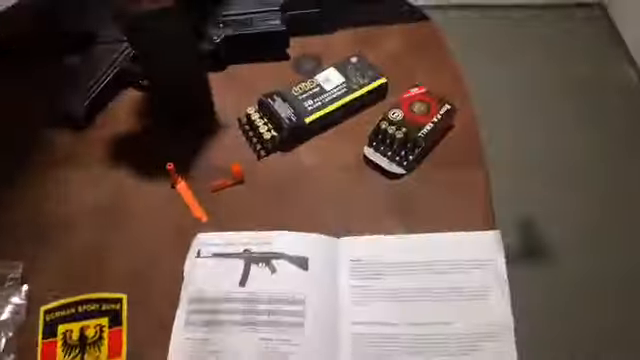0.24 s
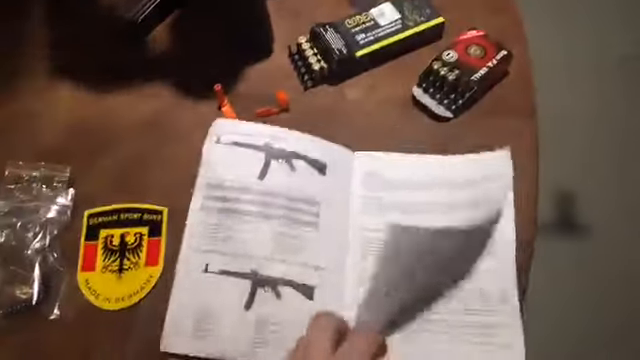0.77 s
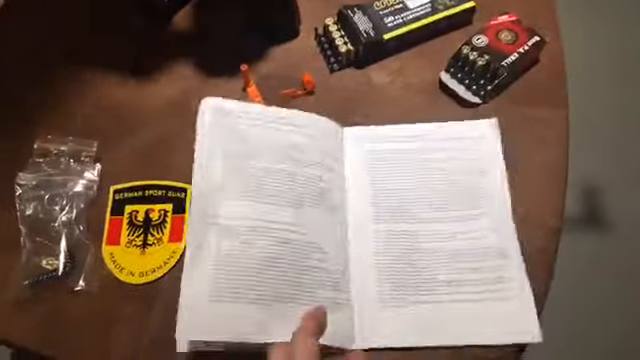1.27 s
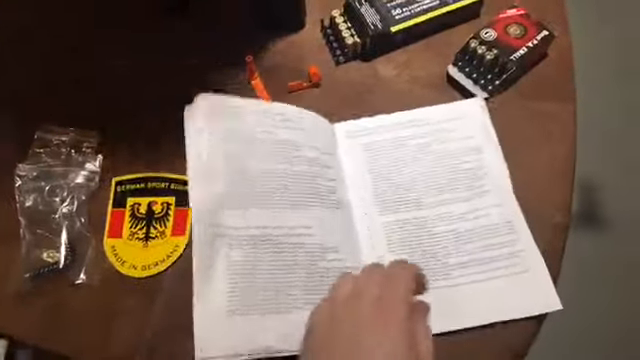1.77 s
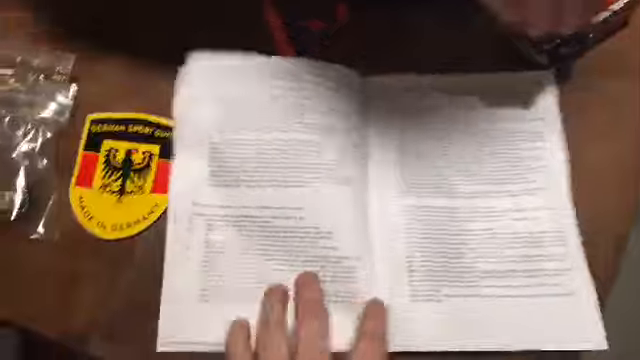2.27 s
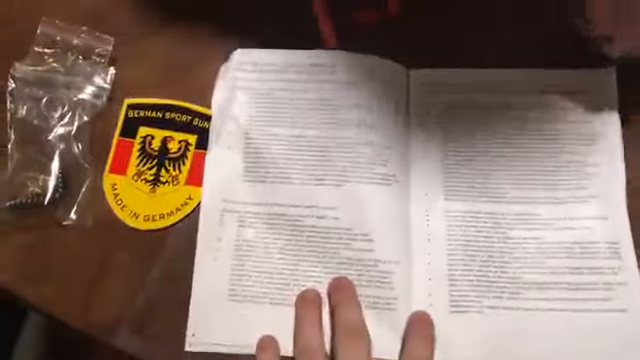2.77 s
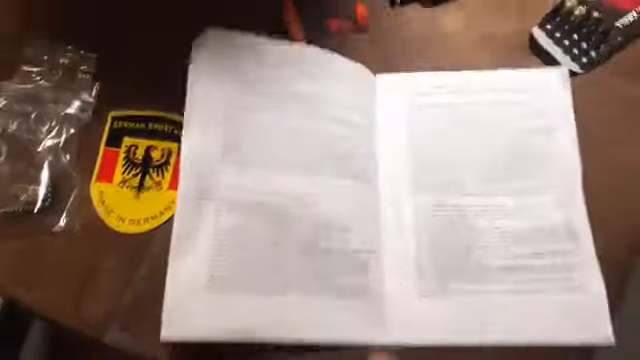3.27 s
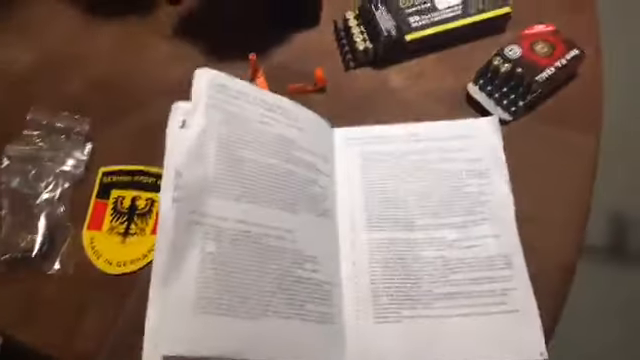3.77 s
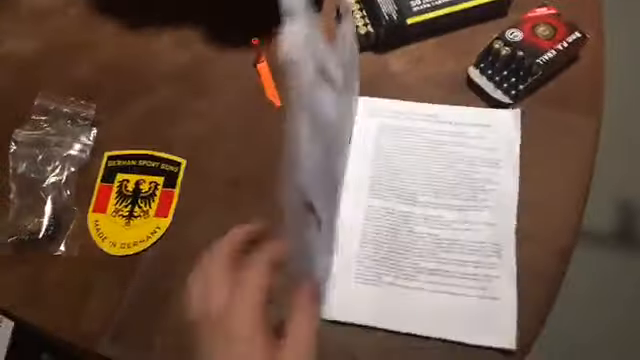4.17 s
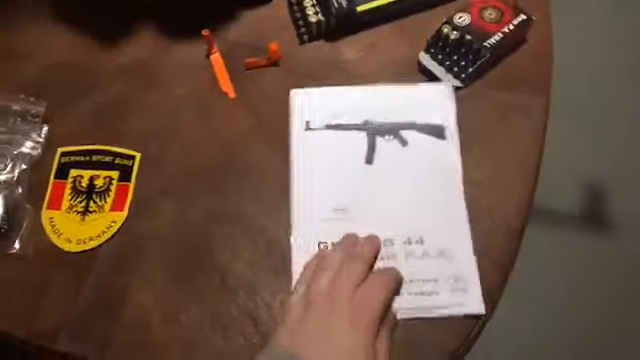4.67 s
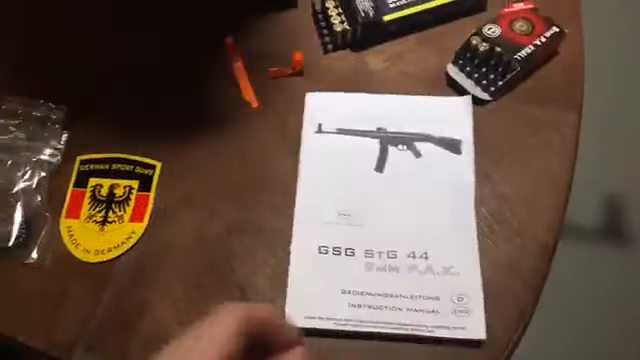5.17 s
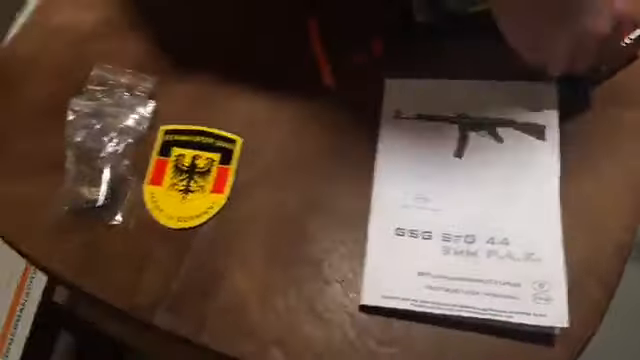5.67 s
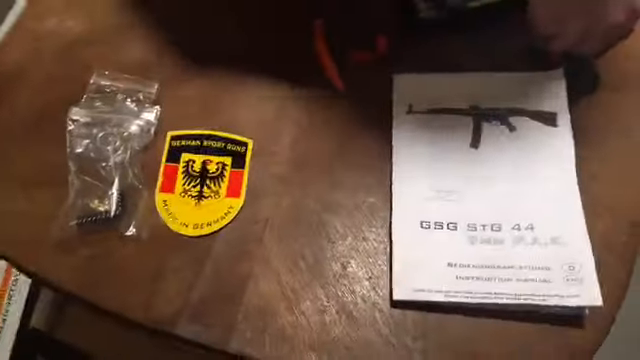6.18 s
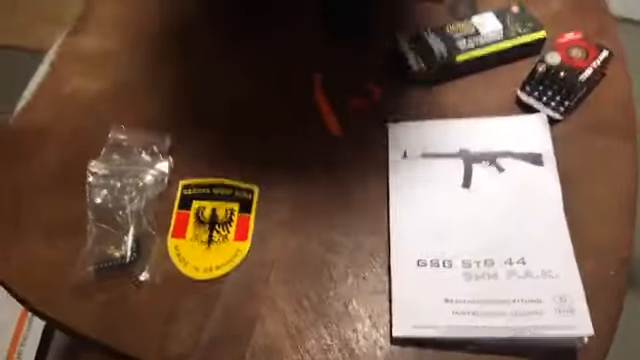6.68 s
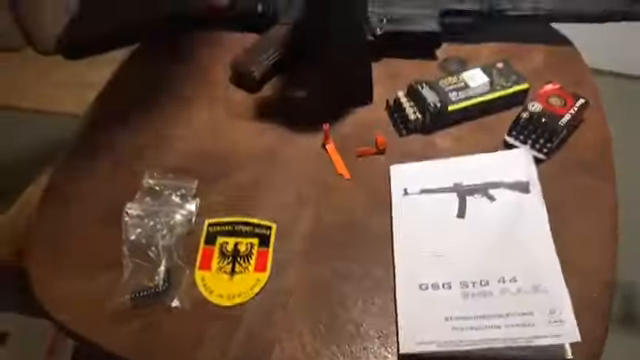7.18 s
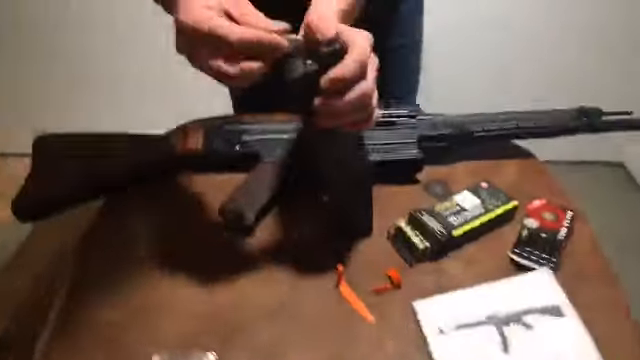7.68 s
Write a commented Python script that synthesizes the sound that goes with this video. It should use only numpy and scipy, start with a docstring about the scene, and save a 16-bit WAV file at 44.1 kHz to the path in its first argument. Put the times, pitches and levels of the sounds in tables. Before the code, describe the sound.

Close-miked handling of metal cartridges and a magazine over a wooden table. Uneven ticks and rattles with page rustle open, leading to a bright snap, then a quiet lull of rubbing. A hard clack and thump break it, another cluster of clicks follows, then mostly faint scuffs before small knocks and three sharp clicks near the end. A short bright room echo and faint low household rumble surround everything.

```python
"""Cartridges and a magazine handled over a table

Heard close by in a small, hard room, brass and steel click as chatters of noise that shake a magazine shell.
Knocks excite the modes of a wooden table top; pages, fingers, card and metal rub as stick-slip noise grains.
A faint scrape sounds a spring, decaying noise forms the room's echo, and a low household rumble lies beneath."""
import sys
import numpy as np
from scipy import signal
from scipy.fft import rfft, irfft, next_fast_len
from scipy.io import wavfile
from scipy.ndimage import uniform_filter1d

SR = 44100
rng = np.random.default_rng(int(sys.argv[2]) if len(sys.argv) > 2 else 0)


def master(y):
    """Save y as 16-bit WAV."""
    cut = np.clip(np.atleast_2d(y).T, -1, 1)
    pcm = np.round(cut * 32767)  # scale
    wavfile.write(sys.argv[1], SR, pcm.astype(np.int16))


N = 349713

# All levels below are those before the microphone's response.
# Contacts of brass, steel, card and paper. Each row: start in seconds, peak of the chatter in dB,
# centre in Hz, treble share in dB.
CONTACTS = [(0.545, -29, 2980, 1), (0.623, -24.5, 3800, -15), (0.71, -16, 1920, -2.5),
            (0.8651, -23, 2430, -9.5), (0.9553, -26.5, 1850, 12), (0.9738, -26, 2370, -8),
            (1.0316, -26.5, 3200, 4), (1.123, -32.5, 2560, 19), (1.2352, -27, 2020, -7),
            (1.2954, -16, 1970, 2), (1.3494, -22.5, 3380, -4), (1.4658, -20.5, 1410, 8),
            (1.5493, -8, 8200, -6), (1.742, -36.5, 1280, -28), (2.2956, -24, 2160, 0.5),
            (2.348, -35, 1230, -13), (2.8116, -34.5, 1230, -4), (3.0968, -39.5, 1800, 1.5),
            (3.2798, -48.5, 1360, 5), (3.8568, -2.5, 2400, 6.5), (4.1726, -25, 4620, -24),
            (4.305, -33.5, 8000, -8), (4.339, -25, 7500, -2), (4.352, -26.5, 3440, -1),
            (4.4572, -27.5, 1300, 19.5), (4.487, -33.5, 2440, -22), (4.6366, -22, 3330, 27),
            (4.7238, -18.5, 2000, 9), (4.8355, -11, 7500, -5.5), (5.007, -33.5, 1930, -19),
            (5.086, -31, 1210, 14.5), (5.092, -29, 3640, 0), (5.3485, -40.5, 1780, -12),
            (6.123, -30.5, 1370, 3.5), (6.271, -31, 1240, -4.5), (6.576, -31.5, 3730, 2.5),
            (7.286, -20, 2480, 5.5), (7.3071, -22, 1200, 11), (7.333, -32, 1163, -7),
            (7.3579, -28.5, 1150, -6), (7.8154, -16.5, 5030, -9.5), (7.8536, -18.5, 1930, 8.5),
            (7.908, -18, 4530, 10)]
# Blows that reach the table top. Each row: start in seconds, peak of the table's ring in dB.
TABLE_BLOWS = [(0.221, -43), (0.464, -42.5), (0.503, -43.5), (0.593, -28), (0.71, -11.5), (0.788, -40.5),
               (0.994, -37.5), (1.391, -31), (1.821, -36.5), (2.072, -37.5), (2.557, -42.5), (2.937, -40),
               (2.96, -40.5), (3.649, -35.5), (3.751, -31.5), (3.859, -9), (4.124, -31), (4.345, -34),
               (4.635, -38.5), (4.721, -35), (4.788, -47), (4.834, -33), (5.051, -32), (5.295, -45),
               (7.29, -29.5), (7.329, -21.5), (7.359, -25), (7.417, -31.5), (7.857, -40.5)]
# Modes of the table top. Each row: frequency in Hz, relative level in dB, 60 dB decay time in seconds.
TABLE_MODES = [(71.6, -4, 0.07), (122.6, -3, 0.164), (171.5, 0.5, 0.091), (193.9, -2.5, 0.14),
               (321, 2, 0.073), (357.4, -0.5, .15), (519, -13, 0.075), (580, -34.5, 0.052)]
# Modes of the magazine shell. Each row: frequency in Hz, relative level in dB, 60 dB decay time in seconds.
SHELL_MODES = [(1138, -8, 0.036), (1620, -1, 0.0046), (2345, -16.5, 0.063), (3360, -15, .04)]
# Modes of the magazine spring. Each row: frequency in Hz, relative level in dB, 60 dB decay time in seconds.
SPRING_MODES = [(2370, 0, .04), (3420, -6, .03)]
# Scuffs of hand, paper, card and metal. Each row: start in seconds, length in seconds,
# level in dB before the swell, centre in Hz.
SCUFF_STROKES = [(0.344, 0.067, -55, 1600), (0.664, 0.082, -39, 1680), (1.257, 0.042, -38.5, 2000),
                 (1.306, 0.046, -39, 2360), (1.357, 0.052, -38, 2240), (1.729, 0.055, -59.5, 1580),
                 (2.185, 0.018, -43.5, 2000), (2.256, 0.058, -45, 1950), (2.349, 0.11, -55.5, 1250),
                 (2.43, 0.14, -52.5, 1360), (2.624, 0.051, -49.5, 1283), (2.835, 0.068, -50.5, 1250),
                 (2.966, 0.087, -61, 1560), (3.7, 0.1, -53, 1360), (3.843, 0.044, -27, 3640),
                 (4.191, 0.028, -50, 2500), (4.45, 0.02, -41.5, 1320), (4.525, 0.011, -46, 2050),
                 (4.6, 0.13, -54.5, 2130), (5.064, 0.042, -54, 1580), (5.57, 0.053, -47, 1066),
                 (5.661, 0.1, -51.5, 1180), (5.766, 0.11, -51, 1320), (5.835, 0.031, -48.5, 1030),
                 (5.897, 0.038, -48, 1250), (6.247, 0.061, -57.5, 1205), (6.288, 0.088, -47.5, 1350),
                 (6.503, 0.083, -66.5, 684), (6.993, 0.067, -68, 1490), (7.142, 0.0535, -72, 885),
                 (7.251, 0.16, -43.5, 1290)]
# Steady rustle of pages and hands. Each row: time in seconds, level in dB.
RUSTLE_LEVELS = [(0, -59), (.13, -72), (.22, -69.5), (.5, -56.5), (.8, -51), (.95, -59.5), (1.2, -56),
                 (1.5, -55.5), (1.95, -80), (2.099, -65.5), (2.6, -72.5), (3.15, -81), (3.6, -80.5),
                 (4.3, -60.5), (4.9, -70), (5.399, -81.5), (6.6, -84.5), (7.93, -80.5)]
# Reverberation of the room. Each row: frequency in Hz, 60 dB decay time in seconds, echo energy in dB.
ROOM_DECAY = [(150, 0.62, -6), (370.4, 0.65, -3.5), (1040, 0.69, 0.5), (2500, 0.78, -6.5), (5560, 0.46, -4),
              (11930, 0.29, -4.5)]
# Spectrum of the household rumble. Each row: frequency in Hz, relative density in dB per Hz.
HOUSE_SPECTRUM = [(15, -44.5), (25, 15), (176, -1), (394, -0.5), (749, -22), (1120, -12.5), (1460, -33.5),
                  (9270, -30), (15000, -22.5)]
# Microphone response. Each row: frequency in Hz, gain in dB.
MIC_RESPONSE = [(30, -12), (120, 3.5), (4000, 3.5), (7500, -5.5), (9500, -5), (12000, -9), (15000, -20)]

# chatter of a 2 kHz contact; each octave brighter multiplies its decay time by the factor
CONTACT_RISE_S, CONTACT_T60_S, CHATTER_SHORTENING = 0.0016, 0.02, 0.75
# peak of the shell against a 2 kHz contact; it is weaker under brighter (smaller) contacts
SHELL_DB, SHELL_DB_PER_OCTAVE = -13.5, -7.5
# share of the contact sent to the walls
CLICK_ECHO_DB = -1.5
# table modes below SOFT_HZ: gain in a 0 dB blow, and rise per dB as blows get weaker
SOFT_HZ, HARD_LOWS_DB, LOWS_PER_DB = 260, -8.5, 0.43
# time constant of the table's build-up as the weight settles; shell peak against the table's
KNOCK_RISE_S, KNOCK_SHELL_DB = 0.0036, -13
# bandwidth of the hollow of hand and box; levels of shell and table against it
RUB_HOLLOW_OCTAVES, RUB_SHELL_DB, RUB_TABLE_DB = 2.25, -20, -9.5
# treble of a 0.1 s scuff; longer slides hiss more
SCUFF_TREBLE_DB, TREBLE_DB_PER_DOUBLING = -1, 2.5
RUSTLE_HZ, RUSTLE_TREBLE_DB = 2000, 3
SPRING_S, SPRING_DB = 5.9, -66
# rms of the rumble before it wavers; rms of the hiss
HOUSE_DB, HOUSE_HISS_DB = -58.5, -77.5
# edge of the microphone's passband
TOP_HZ = 15300


def undb(db):
    """Amplitude is ten to the power of the level in dB over twenty."""
    return 10 ** (np.asarray(db) / 20)


def unit(x):
    """Normalization by the root mean square gives unit rms."""
    return x / np.sqrt(np.mean(x ** 2))


def band(x, hz, octaves):
    """A first-order resonance passes a band around hz with gentle skirts."""
    edges = hz * 2. ** (np.array([-.5, .5]) * octaves)
    edges = np.clip(edges, 20, .45 * SR)
    return signal.sosfilt(signal.butter(1, edges, "band", fs=SR, output="sos"), x)


def colour(x, table):
    """Linear filtering multiplies the spectrum by a response given as (Hz, dB) points."""
    size = next_fast_len(len(x))
    hz, db = np.transpose(table)
    f = np.maximum(np.arange(size // 2 + 1) * SR / size, 1)
    gain = undb(np.interp(np.log(f), np.log(hz), db))
    return irfft(rfft(x, size) * gain, size)[:len(x)]


def ring(modes, gains, seconds):
    """Modal superposition: a struck body sums exponentially decaying sines, here scaled to peak 1."""
    hz, db, t60 = np.transpose(modes)[:, :, None]
    t = np.arange(int(seconds * SR)) / SR
    envelopes = gains[:, None] * undb(db - 60 * t / t60)
    y = np.sum(envelopes * np.sin(2 * np.pi * hz * t), axis=0)
    return y / np.abs(y).max()


def shell_spot():
    """A blow excites each shell mode according to where it lands, here by random gains."""
    return undb(3 * rng.standard_normal(len(SHELL_MODES)))


def add(out, s, y):
    """Superposition: a sound starting at s seconds adds to those already present."""
    i = int(s * SR)
    out[i:i + len(y)] += y[:N - i]


def walk(rate):
    """A random fluctuation slides linearly between normal values, rate of them per second."""
    k = int(SR / rate)
    held = np.repeat(rng.standard_normal(N // k + 1), k)
    return uniform_filter1d(held, k)[:N]


def contact_spectrum(excitation, hz, treble_db):
    """Spectral balance of a contact: a band at its centre plus a share of treble."""
    centre = unit(band(band(excitation, hz, 1.7), hz, 1.7))
    return centre + undb(treble_db) * unit(band(excitation, 6040, 0.74))


def clicks():
    """Forced vibration: each contact's noisy chatter drives the shell; returns near sound and wall feed."""
    near, spread = np.zeros(N), np.zeros(N)
    t = np.arange(int(.12 * SR)) / SR
    impulse = 1. * (t == 0)
    for s, db, hz, treble_db in CONTACTS:
        octaves = np.log2(hz / 2000)
        t60 = CONTACT_T60_S * CHATTER_SHORTENING ** octaves
        rise = np.minimum(t / CONTACT_RISE_S, 1) ** 2
        decay = undb(-60 * np.maximum(t - CONTACT_RISE_S, 0) / t60)
        chatter = rng.standard_normal(len(t)) * rise * decay
        crack = contact_spectrum(chatter, hz, treble_db)
        # averaged over all directions the chatter has a smooth spectrum
        tick = contact_spectrum(impulse, hz, treble_db)
        shell = signal.fftconvolve(chatter, ring(SHELL_MODES, shell_spot(), .1))[:len(t)]
        shell *= undb(db + SHELL_DB + SHELL_DB_PER_OCTAVE * octaves) / np.abs(shell).max()
        size = undb(db) / np.abs(crack).max()
        add(near, s, size * crack + shell)
        add(spread, s, size * undb(CLICK_ECHO_DB) * tick + shell)
    return near, spread


def knocks():
    """Impact on a plate: a brief push excites bending modes, and soft blows favour the lowest."""
    out = np.zeros(N)
    low = np.array(TABLE_MODES)[:, 0] < SOFT_HZ
    # the top flexes and springs back, so no steady push is left over
    push = np.gradient(np.hanning(int(0.0024 * SR)) ** 2)
    for s, db in TABLE_BLOWS:
        lows_db = low * (HARD_LOWS_DB - LOWS_PER_DB * db)
        spot = undb(rng.standard_normal(len(TABLE_MODES)) + lows_db)
        table = np.convolve(ring(TABLE_MODES, spot, .3), push)
        table = table * (1 - np.exp(-np.arange(len(table)) / SR / KNOCK_RISE_S))
        add(out, s, undb(db) * table / np.abs(table).max())
        # the magazine shell rings along
        add(out, s, undb(db + KNOCK_SHELL_DB) * ring(SHELL_MODES, shell_spot(), .1))
    return out


def rubbing():
    """Sliding friction: stick-slip grains are filtered by the hollow of hand and box, the shell and the table."""
    friction = slipping()
    hiss = band(friction, 5500, 1.8)
    bodies = np.zeros(N)
    for modes, db in ((SHELL_MODES, RUB_SHELL_DB), (TABLE_MODES, RUB_TABLE_DB)):
        response = ring(modes, np.ones(len(modes)), 0.044)
        bodies += undb(db) * unit(signal.fftconvolve(friction, response)[:N])

    def rub(part, hz, treble_db):
        """A stretch of friction is the sum of hollow resonance, treble and body vibration."""
        hollow = unit(band(band(friction[part], hz, RUB_HOLLOW_OCTAVES), hz, RUB_HOLLOW_OCTAVES))
        return hollow + undb(treble_db) * unit(hiss[part]) + bodies[part]

    rustle_db = np.interp(np.arange(N) / SR, *np.transpose(RUSTLE_LEVELS))
    out = undb(rustle_db) * rub(slice(N), RUSTLE_HZ, RUSTLE_TREBLE_DB)
    for s, length, db, hz in SCUFF_STROKES:
        treble_db = SCUFF_TREBLE_DB + TREBLE_DB_PER_DOUBLING * np.log2(length / .1)
        scuff = rub(slice(int(s * SR), int((s + length) * SR)), hz, treble_db)
        # pressure comes on quickly and lets go slowly
        pressure = np.sin(np.pi * np.linspace(0, 1, len(scuff)) ** 0.58)
        add(out, s, undb(db) * pressure * scuff)
    return out


def puffs(rate):
    """Shot process: random slips, rate per second on average, each open a window about 2 ms wide."""
    slips = (rng.random(N) < rate / SR) * undb(2.6 * rng.exponential(size=N))
    return unit(np.convolve(slips, signal.windows.gaussian(256, 40))[:N])


def slipping():
    """Stick-slip: grains of noise, some across the spectrum and some in one octave, swell in random gusts."""
    broad = puffs(300)
    gusts = undb(4.5 * walk(60))
    friction = np.zeros(N)
    for hz in 250 * 2. ** np.arange(7):
        # 0.57 is a steady floor between the grains
        grains = 0.54 * broad + puffs(180) + 0.57
        friction += band(grains * gusts * rng.standard_normal(N), hz, 0.97)
    return unit(friction)


def spring():
    """Resonance under noise: a fading scrape makes the magazine spring buzz at its modes."""
    out = np.zeros(N)
    scrape = rng.standard_normal(int(.16 * SR))
    scrape *= np.linspace(1, 0, len(scrape))
    buzz = signal.fftconvolve(scrape, ring(SPRING_MODES, np.ones(len(SPRING_MODES)), .1))
    add(out, SPRING_S, undb(SPRING_DB) * unit(buzz))
    return out


def room(x):
    """Diffuse reverberation: after a short gap, walls return noise whose decay time varies with frequency."""
    f, t, cells = signal.stft(rng.standard_normal(SR), SR, nperseg=256)
    hz, t60, db = np.transpose(ROOM_DECAY)
    t60 = np.interp(np.log(f + 1), np.log(hz), t60)[:, None]
    db = np.interp(np.log(f + 1), np.log(hz), db)[:, None]
    # the energy of a decay is its length over 6 ln 10
    energy = t60 * SR / (6 * np.log(10))
    decay = undb(db - 60 * t / t60) / np.sqrt(energy)
    tail = signal.istft(cells * decay, SR)[1]
    # silent for 3 ms, then a fade-in of 1.7 ms
    tail *= np.clip((np.arange(len(tail)) / SR - .003) / 0.0017, 0, 1)
    return signal.fftconvolve(x, tail)[:N]


def house():
    """Ambient noise: a low coloured rumble whose level wavers a little, with faint white hiss above."""
    waver = undb(2 * walk(8))
    rumble = undb(HOUSE_DB) * waver * unit(colour(rng.standard_normal(N), HOUSE_SPECTRUM))
    return rumble + undb(HOUSE_HISS_DB) * rng.standard_normal(N)


def scene():
    """Superposition of direct sound from the hands and table, its reverberation, and the house."""
    near, spread = clicks()
    bodies = knocks() + rubbing() + spring()
    return (near + bodies + room(spread + bodies) + house())[None, :]


def record(dry):
    """Transducer response: the microphone colours the sound, and a steep low-pass ends its band."""
    coloured = colour(dry[0], MIC_RESPONSE)
    lowpass = signal.ellip(10, .2, 80, TOP_HZ, fs=SR, output="sos")
    return signal.sosfilt(lowpass, coloured)[None, :]


dry = scene()
out = record(dry)
master(out)
```